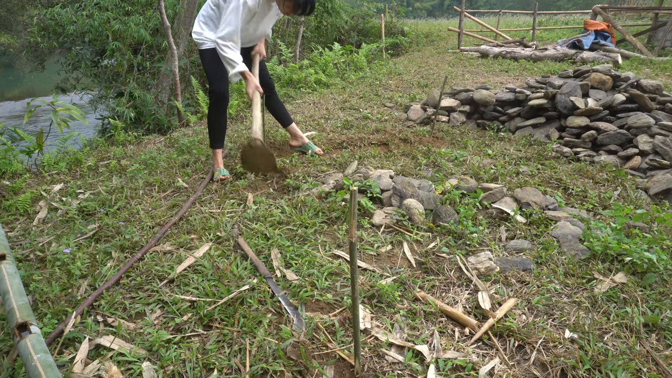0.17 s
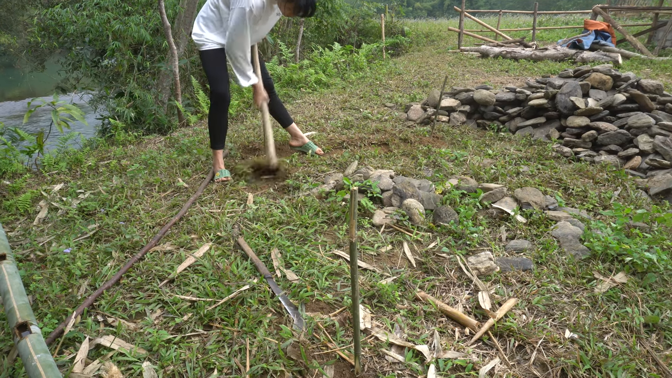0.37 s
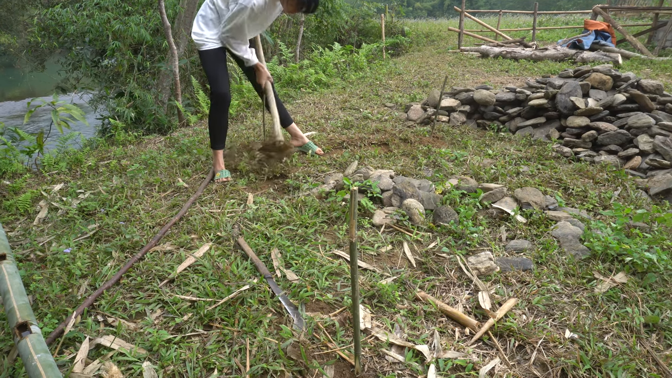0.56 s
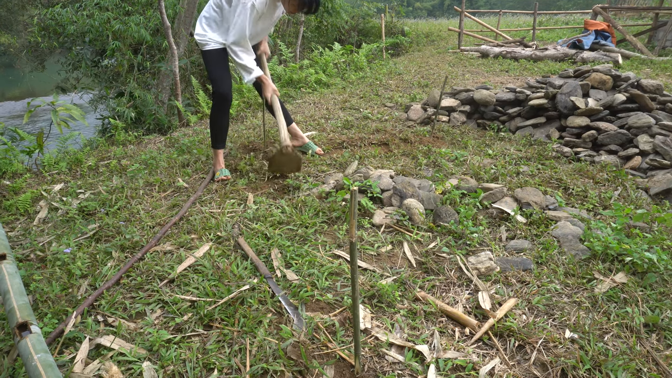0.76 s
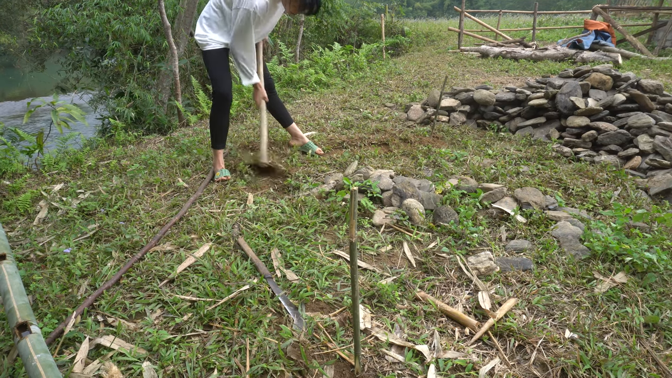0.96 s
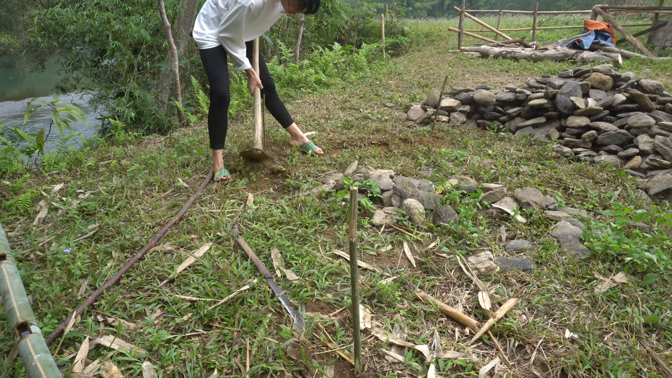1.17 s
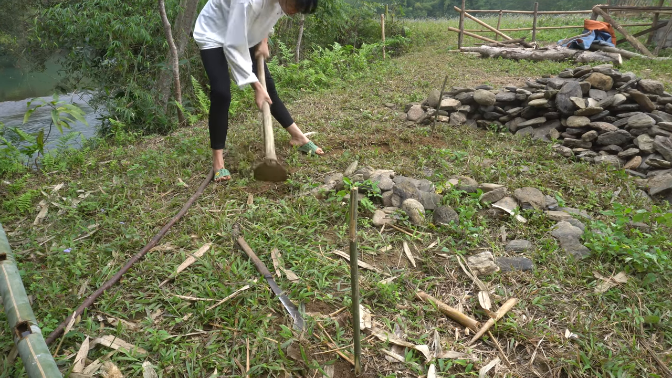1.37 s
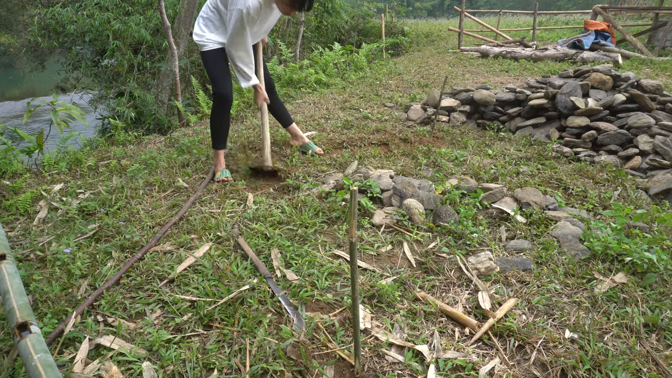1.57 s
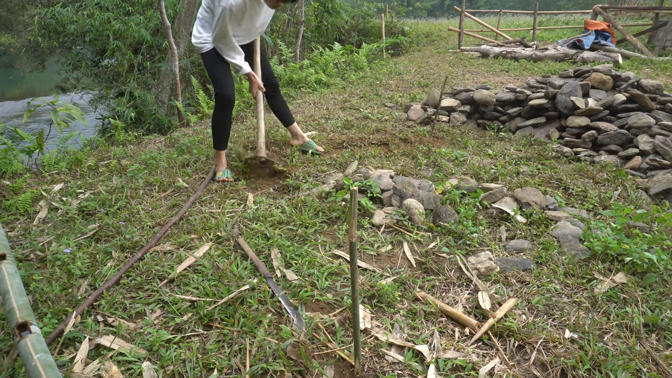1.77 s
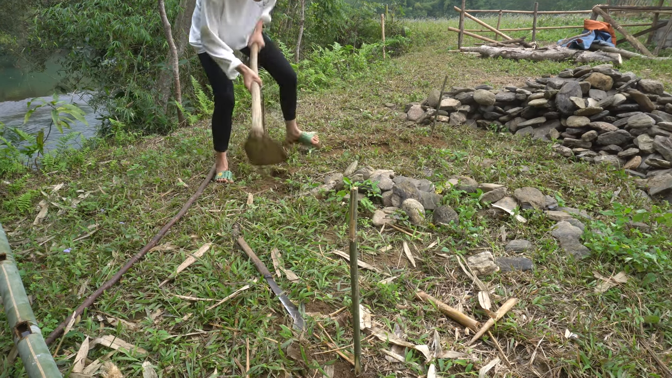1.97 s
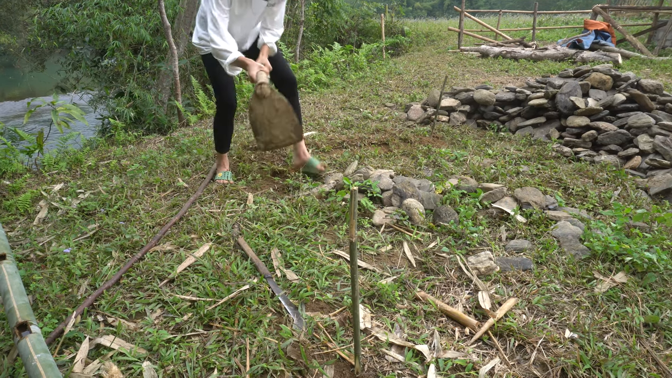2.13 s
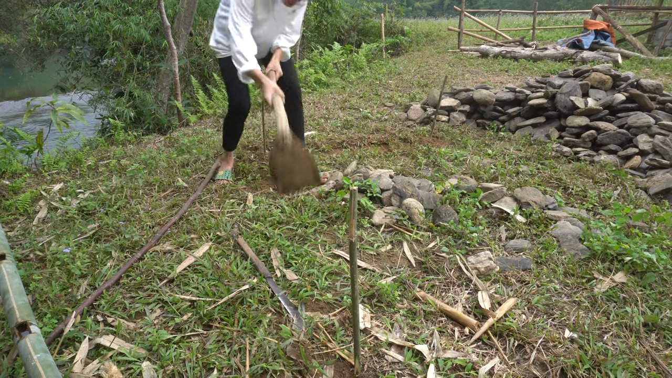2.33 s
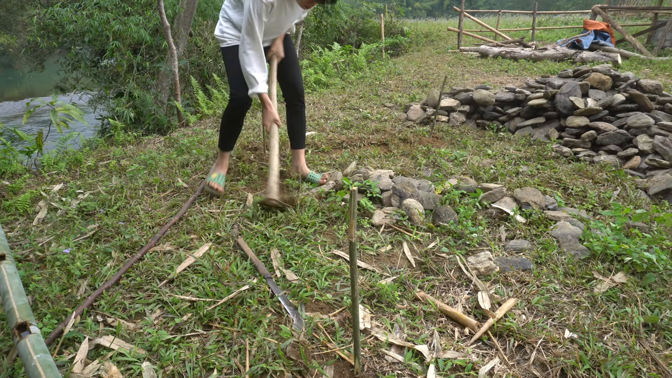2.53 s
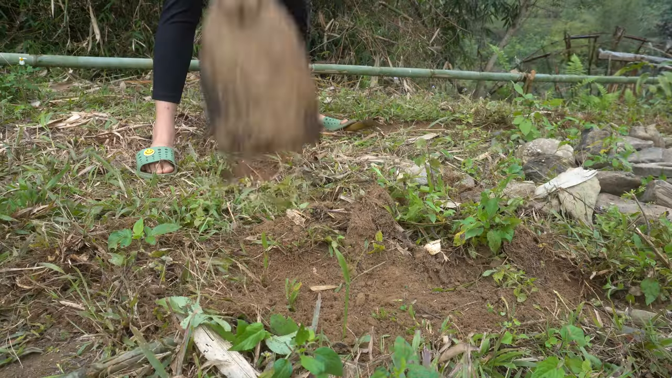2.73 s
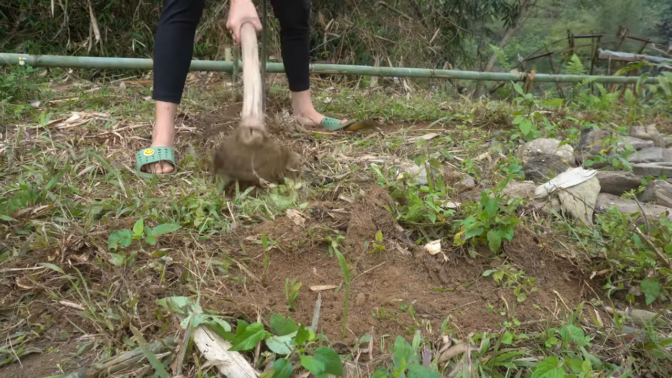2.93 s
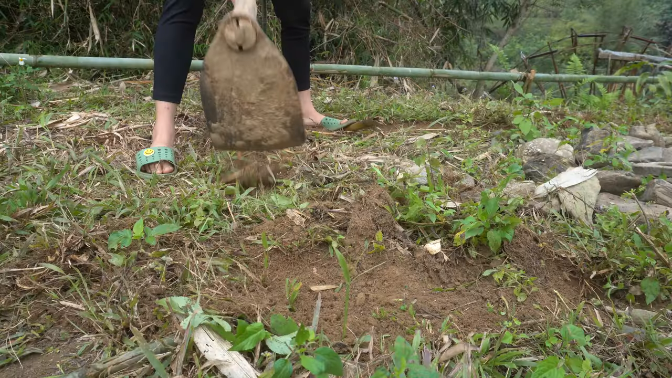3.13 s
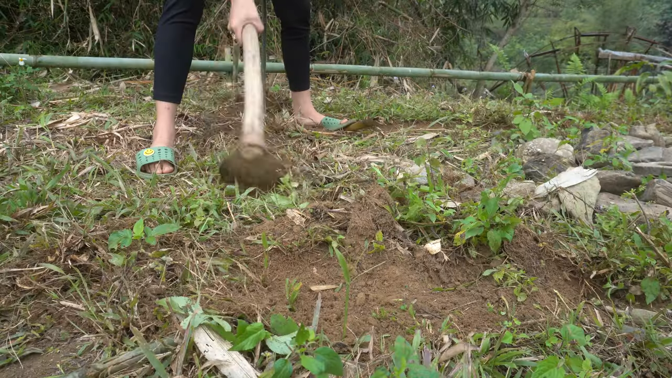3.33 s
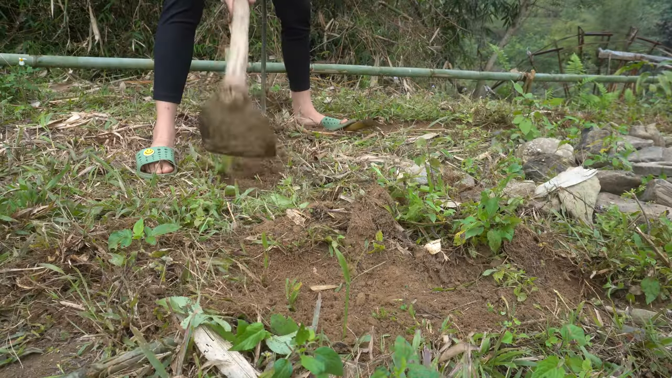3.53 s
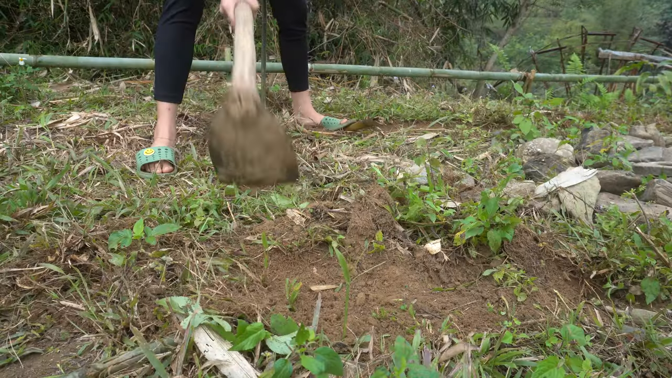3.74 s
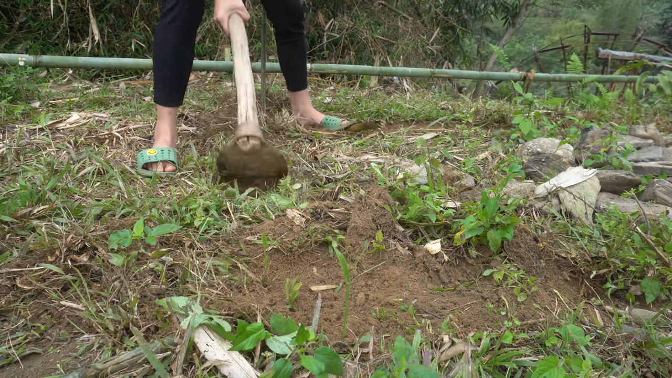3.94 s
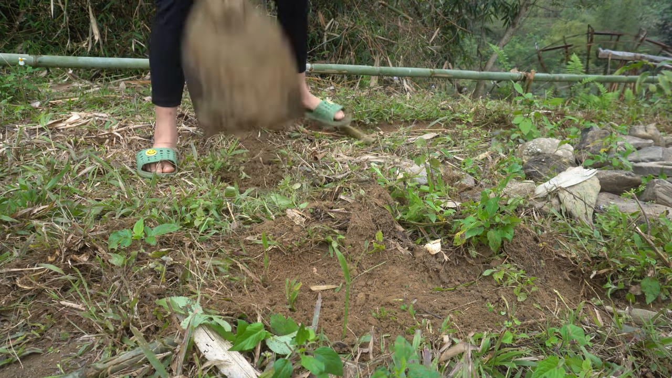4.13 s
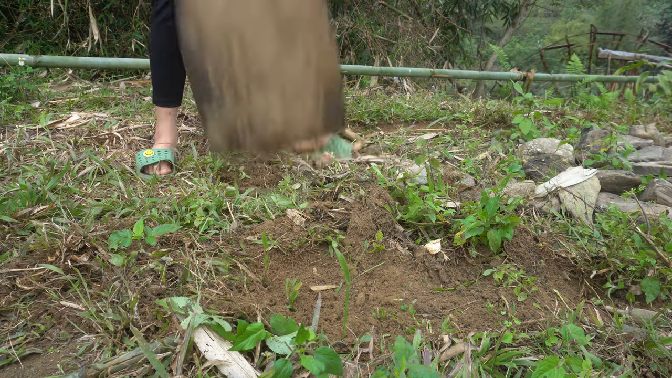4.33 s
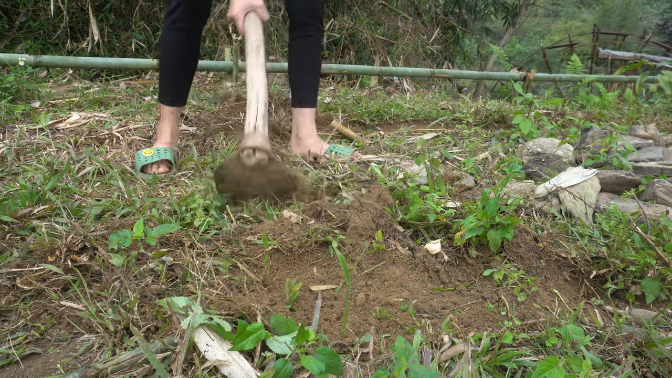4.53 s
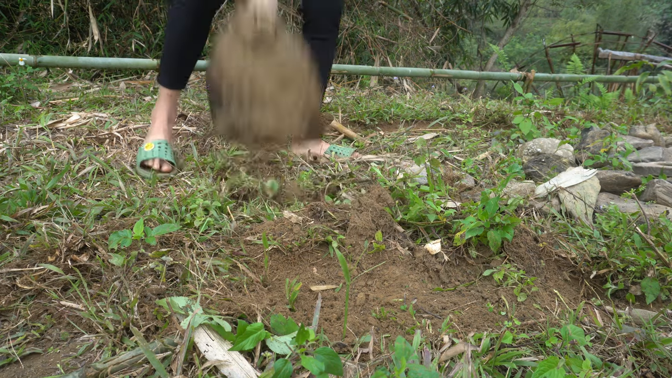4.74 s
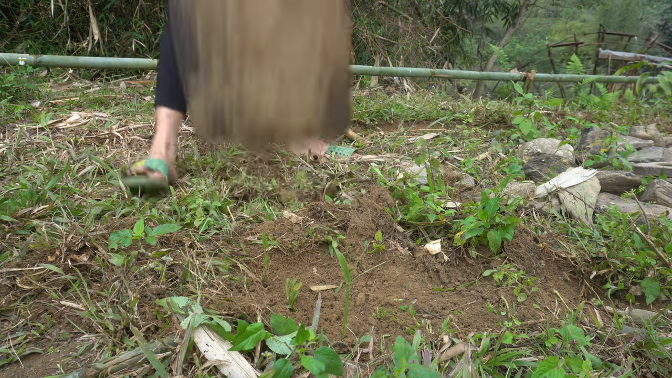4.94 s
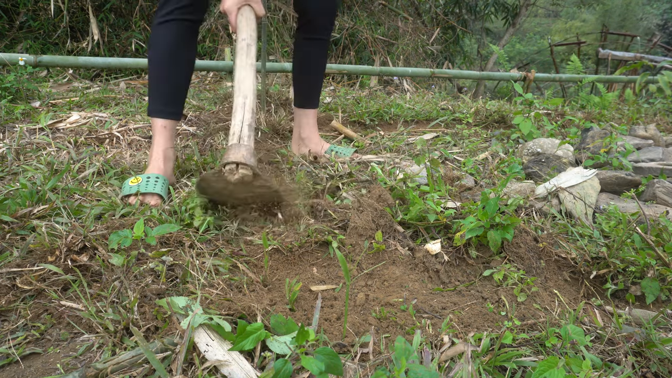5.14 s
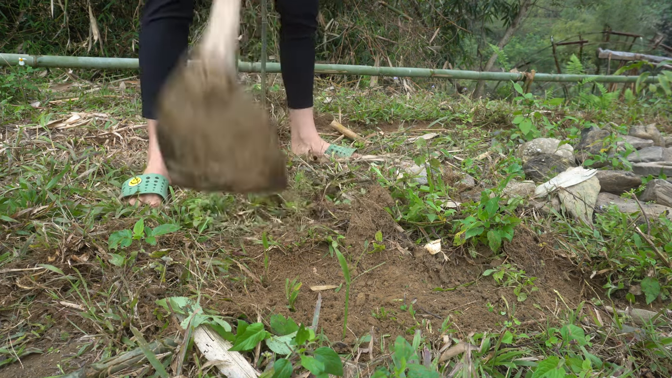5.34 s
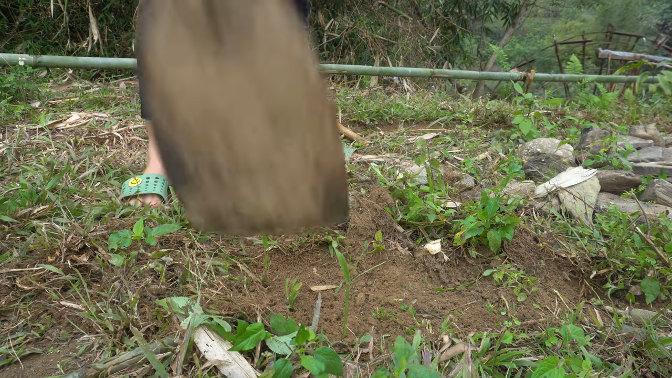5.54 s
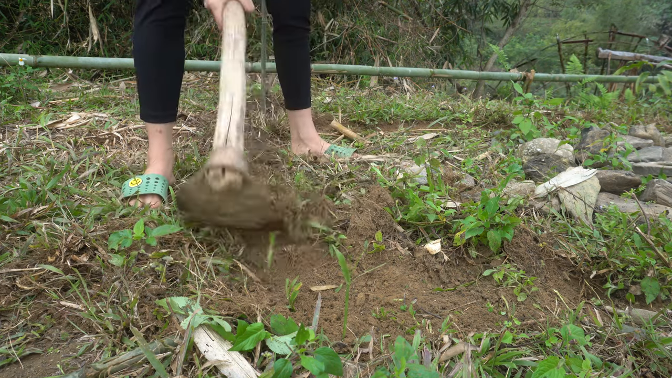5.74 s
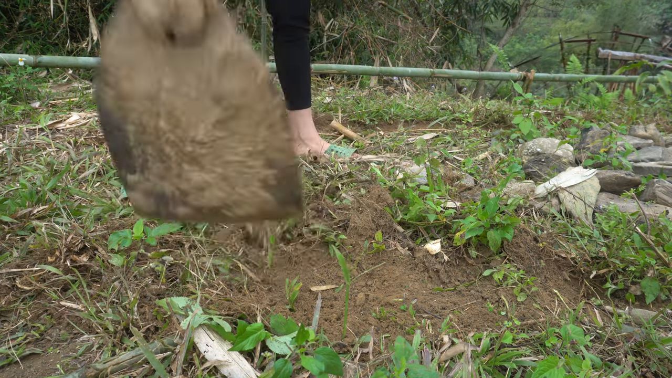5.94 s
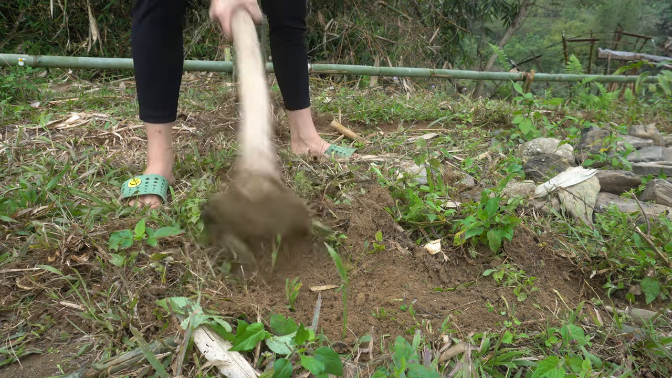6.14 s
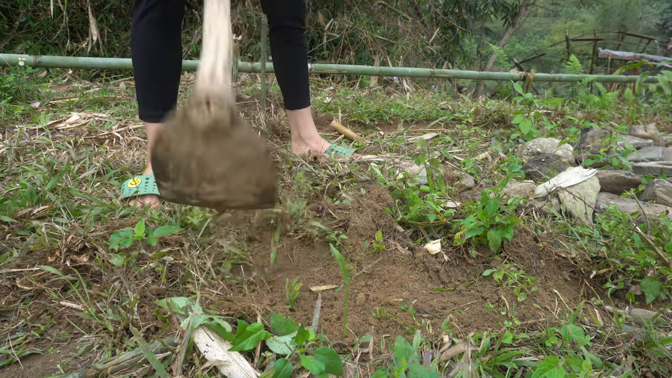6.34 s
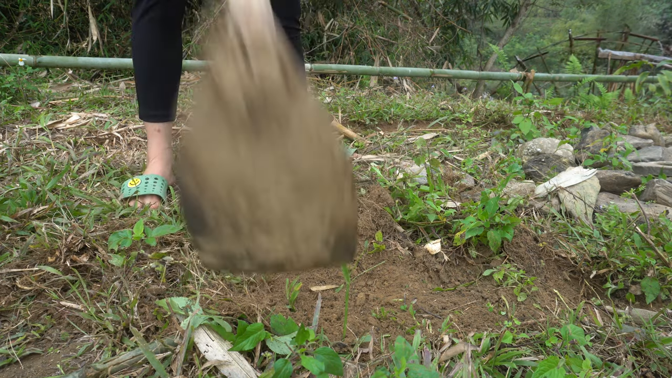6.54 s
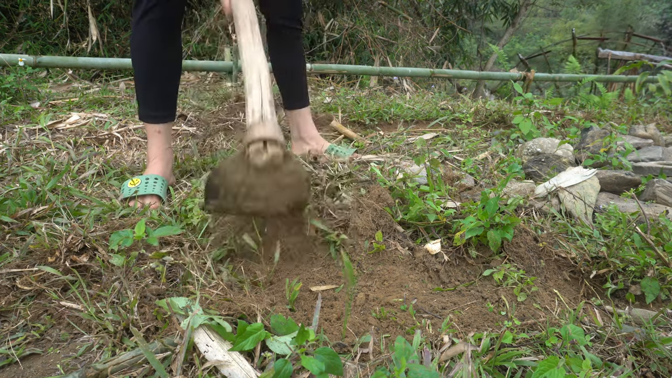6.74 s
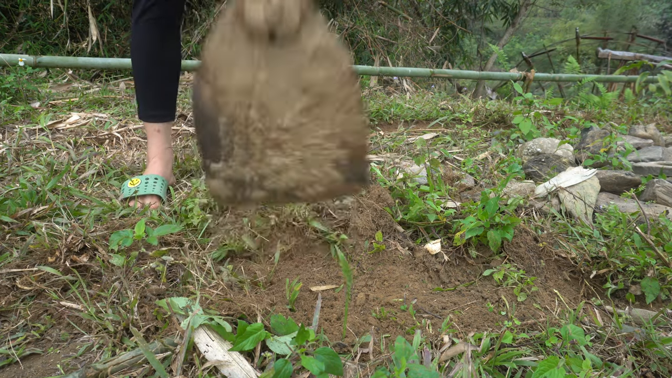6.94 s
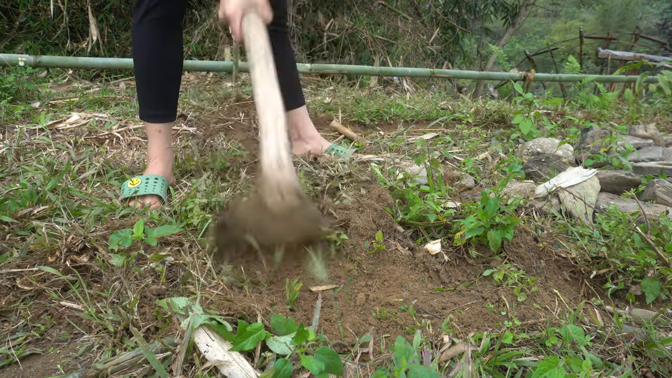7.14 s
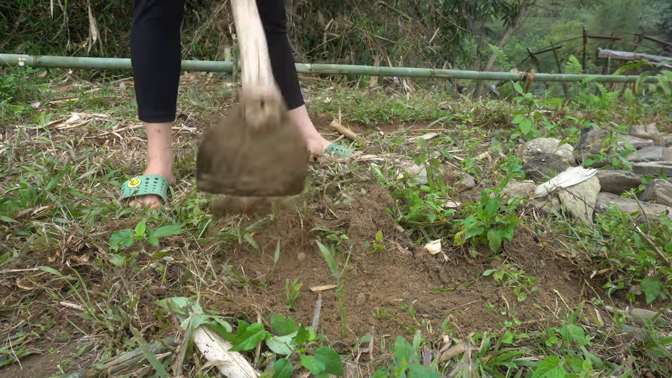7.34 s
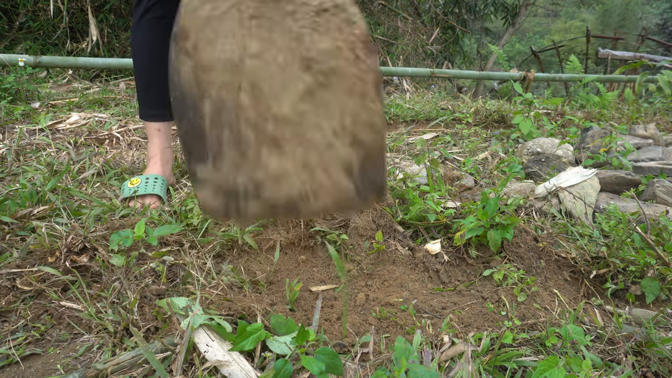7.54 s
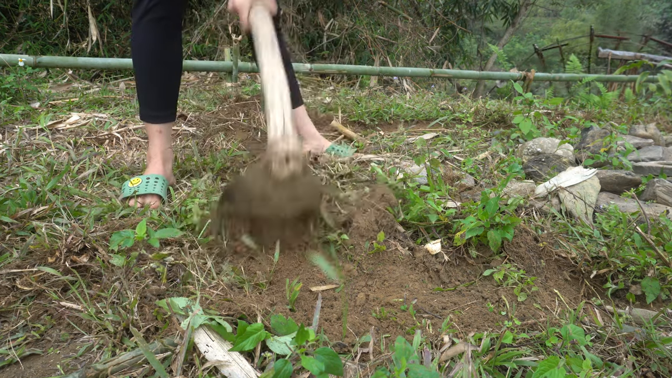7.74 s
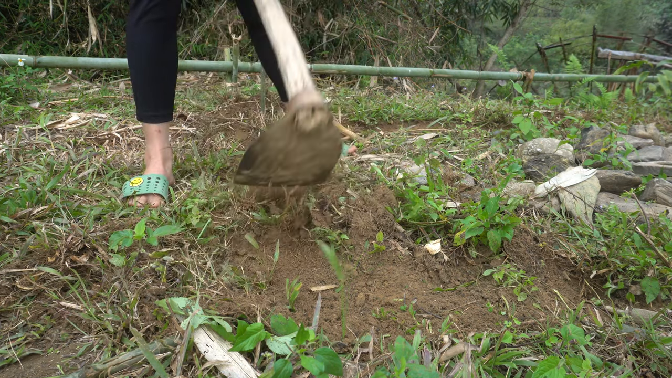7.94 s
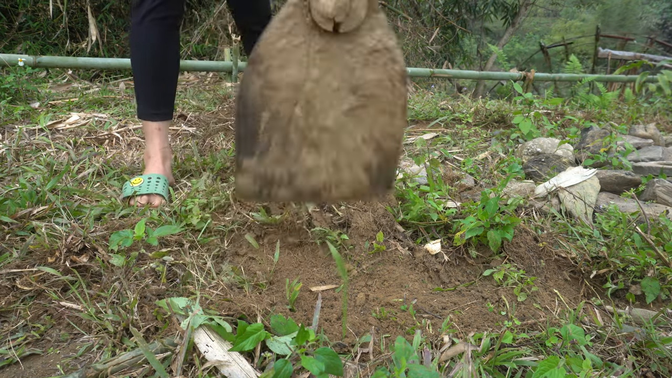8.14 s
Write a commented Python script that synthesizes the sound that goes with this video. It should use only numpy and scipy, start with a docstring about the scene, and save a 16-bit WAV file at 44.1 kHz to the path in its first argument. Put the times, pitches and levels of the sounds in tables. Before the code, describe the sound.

Outdoors, a hoe chops into grassy ground. The first strokes are soft and a few metres away, with one hollow wooden knock from the right. After a tiny silent gap the microphone is close: gritty crunches, firm low thuds, stony ticks and a brief dull steel ring come about twice a second and grow heavier. Loose soil and grass rustle between blows, while a single-cylinder engine chugs far off.

```python
"""Hoe chopping grassy soil

A hoe chops outdoors: first from a few metres, then, after a short silent cut, from close by. Each stroke crunches
grit and breaks clods (shaped grains), thuds (short swinging pushes), snaps (ticks) and rings the steel (modes).
Loose soil and dragged grass rustle as fine grains. One hollow wooden knock, made of modes, comes from the right.
Far off a slow single-cylinder engine chugs as rung exhaust and gas puffs, over hum, outdoor hiss and rumble."""
import sys
import numpy as np
from scipy import signal
from scipy.fft import rfft, irfft, next_fast_len
from scipy.io import wavfile
from scipy.ndimage import uniform_filter1d

SR = 44100
rng = np.random.default_rng(int(sys.argv[2]) if len(sys.argv) > 2 else 0)


def persist_wave(psi):
    """Save psi, clipped to +-1, as 16-bit WAV."""
    counts = np.round(np.clip(psi, -1, 1) * 32767).astype(np.int16)
    wavfile.write(sys.argv[1], SR, np.atleast_2d(counts).T)


def nominal_scale(level):
    """Amplitude ratio for a level in decibels (scalar or array-like)."""
    x = np.asarray(level, float) / 20
    return 10 ** x


N = 361619
T = np.arange(N) / SR  # seconds
FFT = next_fast_len(N)
HZ = np.arange(FFT // 2 + 1) * SR / FFT + 1e-3  # just above zero, so that its log exists

# The blade cutting in. Each row: touch in seconds, length of the cut in seconds, crunch in dB at the touch
# and at the stop, clods against the crunch in dB, crumble in dB, length of the crumble in seconds.
STROKES = [(0.322, 0.034, -39, -30, 2.5, -41.5, 0.1), (0.908, 0.024, -32, -29, -1.5, -35.5, 0.1),
           (1.493, 0.033, -41, -29, -2.5, -38, 0.067), (2.492, .03, -42, -25.5, -1.5, -30.5, 0.035),
           (2.845, 0.038, -39, -22.5, -0.5, -33, 0.043), (3.343, 0.027, -30.5, -30.5, 4.5, -48.5, 0.042),
           (3.835, 0.028, -38.5, -25.5, -2.5, -34.5, 0.052), (4.461, 0.035, -29, -16, -2.5, -28, 0.072),
           (5.07, 0.025, -22.5, -20.5, 0, -36.5, 0.07), (5.654, 0.022, -19, -21.5, -3.5, -30.5, 0.082),
           (6.112, 0.028, -39.5, -20, -4.5, -29, 0.041), (6.628, 0.027, -38.5, -20.5, -1, -39.5, 0.086),
           (7.132, 0.029, -41, -17.5, -1, -31.5, 0.094), (7.694, .102, -40, -38.5, -8, -47, .03)]
# What each stroke sets off. Each row: steel ring against the crunch in dB, favoured blade pitch in Hz,
# trickling soil in dB, treble of the grit in dB.
STROKE_AFTERMATH = [(-50, 1600, -44, 5), (-47, 1600, -50, -1), (-27.5, 1500, -48.5, 0.5),
                    (-28, 1300, -44.5, 3), (-34, 5300, -46.5, 1), (-32.5, 4680, -47.5, 1),
                    (-36.5, 5800, -53.5, -1), (-36, 2700, -45.5, 0.5), (-38, 5800, -44.5, 0.5),
                    (-22.5, 850, -49, -1.5), (-37, 2100, -50.5, -1), (-37, 4300, -55, 4),
                    (-36, 2200, -52, -3), (-59, 5800, -48, 5)]
# How alike distant sound is at the two microphones. Each row: frequency in Hz, likeness from 0 to 1.
FAR_LIKENESS = [(60, .999), (200, 0.94), (500, 0.85), (1000, 0.44), (2500, 0.23), (12000, 0.1)]
# Start and end of the silent cut between the two views, in seconds.
CUT_S = 2.748, 2.782


def along_hz(points):
    """Reads a short spectrum at every frequency, straight along log frequency."""
    hz, value = np.transpose(points)
    return np.interp(np.log(HZ), np.log(hz), value)


def gain_curve(s, db):
    """Gain over time from dB points, silent outside the curve."""
    return nominal_scale(np.interp(T, s, db)) * (T >= s[0]) * (T <= s[-1])


def colour(x, points, lo_hz, hi_hz):
    """Filters to a spectrum (Hz, dB) and scales to rms 1 between lo_hz and hi_hz."""
    spectrum = rfft(x, FFT) * nominal_scale(along_hz(points))
    inside = (HZ > lo_hz) & (HZ < hi_hz)
    band_energy = np.sum(abs(spectrum[inside]) ** 2)
    return irfft(spectrum, FFT)[:N] * np.sqrt(FFT * N / 2 / band_energy)


def grains(rate, spread_db):
    """Random clicks of either sign, rate a second on average, a few far larger than the rest."""
    boost_db = np.minimum(spread_db * rng.exponential(size=N), 5 * spread_db)
    size = rng.standard_normal(N) * nominal_scale(boost_db)
    return size * (rng.random(N) < rate / SR)


def ring(x, modes):
    """Decaying two-pole resonances (Hz, dB, seconds to fall 60 dB) driven by x."""
    out = 0
    for hz, db, t60 in modes:
        pole = np.exp((2j * np.pi * hz - np.log(1000) / t60) / SR)
        out = out + signal.lfilter([0, nominal_scale(db) * pole.imag], [1, -2 * pole.real, abs(pole) ** 2], x)
    return out


def walk(rate):
    """Smooth random wander, spread near 1, with rate new values a second."""
    k = int(SR / rate)
    steps = np.repeat(rng.standard_normal(N // k + 1), k)
    return 1.3 * uniform_filter1d(uniform_filter1d(steps, k), k)[:N]


def add(out, s, sound):
    """Mixes a short sound in at s seconds."""
    i = int(s * SR)
    out[i:i + len(sound)] += sound[:N - i]


def split(x):
    """The parts below and above a gentle treble edge at 6 kHz."""
    low = signal.lfilter(*signal.butter(1, 6000, fs=SR), x)
    return low, x - low


def ports(source, balance, likeness):
    """Two microphones share one run of a source; a second run, opposite in sign, makes them differ."""
    # Phase between the microphones. Each row: frequency in Hz, lead of the left side in radians.
    lead = [(60, -.05), (200, -.13), (1000, -.3), (2200, .05), (5000, .5), (12000, .3)]
    angle = np.arccos(np.clip(along_hz(likeness), 0, 1)) / 2
    side = np.array([[1], [-1]])  # left, right
    balance_db = along_hz(balance)  # left minus right
    tilt = nominal_scale(side * balance_db / 2) * np.exp(.5j * side * along_hz(lead))
    shared = np.cos(angle) * rfft(source(), FFT)
    unlike = 1j * side * np.sin(angle) * rfft(source(), FFT)
    mean_gain = np.cosh(balance_db * np.log(10) / 40)  # mean of the two sides' gains
    return irfft(tilt * (shared + unlike) / mean_gain, FFT)[:, :N]


def strokes():
    """Grit crackles under the blade, clods break, and the same grit shakes the steel."""
    # Grit spectrum. Each row: frequency in Hz, density in dB per Hz.
    grit_spectrum = [(530, -53), (900, 1.5), (1220, -10), (2070, -0.5), (3300, -4.5), (4700, -6),
                     (13400, -6.5), (16000, -17)]
    # Clod spectrum. Each row: frequency in Hz, density in dB per Hz.
    clod_spectrum = [(71, -10), (120, -3), (695, -2.5), (814, -12), (1010, -11), (1310, -14.5), (1590, -5),
                     (1800, -14), (2340, -64), (3960, -120)]
    ring_db, favoured_hz, _, treble_db = np.transpose(STROKE_AFTERMATH)
    starts = np.transpose(STROKES)[0] - 0.0099  # the crunch begins just before the touch
    stroke = (np.searchsorted(starts, T) - 1).clip(0)
    crunch, body = stroke_shape()
    grit = grains(14000, 1.3) * nominal_scale(3.23 * walk(300))  # the blade slips in jerks
    clods = colour(grains(2500, 0.96), clod_spectrum, 250, 1000)
    shake = crunch * nominal_scale(ring_db)[stroke] * grit / grit.std()
    dull, bright = split(colour(grit, grit_spectrum, 2200, 12100))
    crackle = crunch * (dull + nominal_scale(treble_db)[stroke] * bright)
    return crackle + body * clods + blade(shake, favoured_hz[stroke])


def stroke_shape():
    """Crunch and clod gains: touch, cut through grass, bite into soil, stop, crumble."""
    lead_s, drop_s = 0.0099, 0.013  # start before the touch; fall to a crumble once the blade stops
    bite_at, bite_share = 0.8, 0.32  # share of the cut gone, and of the dB rise reached, at the bite
    faint_db, silent_db = -54, -69  # where the crumble ends; between strokes
    s, cut, touch_db, stop_db, clods_db, crumble_db, crumble = np.transpose(STROKES)
    stop, flat = s + cut, np.ones(len(s))
    end = stop + drop_s + crumble
    times = [s - lead_s, s, s + bite_at * cut, stop, stop + drop_s, end, end + lead_s]
    bite_db = touch_db + bite_share * (stop_db - touch_db)
    db = np.array([silent_db * flat, touch_db, bite_db, stop_db, crumble_db, faint_db * flat, silent_db * flat])
    # clods break mostly when the blade is deepest
    depth_db = np.array([-9, -9, -4.5, 0, 0, -22, -22])[:, None]
    times = np.ravel(times, "F")  # stroke after stroke
    crunch = gain_curve(times, np.ravel(db, "F"))
    return crunch, gain_curve(times, np.ravel(db + clods_db + depth_db, "F"))


def thuds():
    """The blade stops in the ground: a soft push swells, swings back and dies."""
    # Each row: time of the full swell in seconds, its level in dB, pitch in Hz, rise in seconds.
    stops = [(0.363, -27.5, 150, 0.002), (0.933, -36.5, 242, 0.0018), (2.88, -28, 168, .0017),
             (3.363, -17, 166, 0.00096), (3.864, -28, 229, 0.0036), (4.488, -39, 81, 0.0076),
             (4.491, -19.5, 186, 0.0041), (5.082, -19, 219, .0022), (5.661, -17.5, 152, 0.0062),
             (6.139, -14, 174, 0.00076), (6.155, -23, 110, 0.0032), (6.658, -15.5, 109, 0.0041),
             (7.163, -10, 136, 0.0015), (7.727, -25.5, 140, 0.0044)]
    out, t = np.zeros(N), T[:SR // 8]
    for s, db, hz, swell in stops:
        swing = -np.cos(2 * np.pi * hz * (t - swell))
        envelope = t / swell * np.exp(1 - t / swell)
        add(out, s - swell, nominal_scale(db) * swing * envelope)
    return out


def snaps():
    """Stones and snapping stems: a sharp tick with a short gritty tail also strikes the steel."""
    # Each row: start in seconds, relative level in dB, pitch in Hz, push on the blade against that level in dB.
    ticks = [(0.36, -7, 1650, -30), (0.97, -15, 1560, -14), (1.497, -21.5, 1600, -26),
             (1.521, -20, 680, -4), (2.518, -13, 2570, -29), (2.869, -33, 1610, -19),
             (3.303, -31, 3010, -11), (3.889, -17.5, 1320, -18), (4.464, -27, 2400, -24),
             (4.49, -10.5, 680, -7.5), (4.547, -30, 684, -1), (4.975, -29, 5000, -25),
             (5.289, -21, 9200, -25), (5.629, -32, 2150, 0.5), (5.675, -16, 680, -7),
             (5.691, -25, 1600, -2), (5.71, -22.5, 5820, -12), (6.113, -27.5, 3010, -11),
             (6.118, -19, 3010, -16), (6.14, -5.5, 2060, -19), (6.601, -19.5, 9300, -30),
             (6.632, -25, 3010, -9), (6.65, -10, 676, -11), (6.668, -30.5, 2100, 4.5),
             (7.107, -26, 7500, -28), (7.158, -19, 704, -1), (7.174, -28.5, 5900, -2),
             (7.36, -32, 7000, -22), (7.447, -38, 10000, -30), (7.665, -22, 3010, -31),
             (7.709, 1, 8700, -22), (7.7151, -2.5, 4900, -35), (7.793, -21, 3000, -24),
             (8.129, -36, 12000, -30)]
    tick_s, grit_s, grit_db = 0.00046, 0.0026, -9.5  # decay of the tick and of its grit; grit level
    out, push, favoured_hz, t = np.zeros(N), np.zeros(N), np.ones(N), T[:SR // 50]
    for s, db, hz, ring_db in ticks:
        noise = rng.standard_normal(len(t))
        noise = signal.lfilter([1, -np.exp(-2500 / hz)], [1], noise)  # brighter ticks have thinner grit
        tick = np.sin(2 * np.pi * hz * t) * np.exp(-t / tick_s)
        tail = nominal_scale(grit_db) * noise * np.exp(-t / grit_s)
        add(out, s, nominal_scale(db) * (tick + tail) / np.sqrt(2))
        i = int(s * SR)
        push[i], favoured_hz[i] = nominal_scale(db + ring_db), hz
    return out + blade(push, favoured_hz)


def blade(push, favoured_hz):
    """The steel rings briefly; the spot that is struck favours the modes near one pitch."""
    # Modes of the blade. Each row: pitch in Hz, level in dB, time to fall 60 dB in seconds.
    modes = [(679.6, 0.5, 0.076), (1350, -15, 0.11), (1610, -9.5, 0.08), (2060, -6, 0.1), (2730, -2, 0.048),
             (3028, -1, 0.11), (3550, -6, 0.076), (4365, 1, 0.07), (5820, 4.5, 0.062), (6200, 4, 0.047),
             (7500, 1, 0.026)]
    off_mode_db = -8  # per octave away from the favoured pitch
    out, struck = 0, np.flatnonzero(abs(push) > 1e-6)
    for mode in modes:
        octaves = abs(np.log2(mode[0] / favoured_hz[struck]))
        weighted = np.zeros(N)
        weighted[struck] = push[struck] * nominal_scale(off_mode_db * octaves)
        out = out + ring(weighted, [mode])
    return out


def rustle():
    """Fine dry grains: soil trickles after each stroke, grass is dragged and feet shift."""
    # Spectrum of the grains. Each row: frequency in Hz, density in dB per Hz.
    dust_spectrum = [(410, -4), (750, -7.5), (1640, -1), (3740, -5), (10000, -1.5), (16000, -5)]
    # Grass dragged, feet shifting. Each row: loudest moment in seconds, level in dB, rise in seconds,
    # fall in seconds, treble against the rest in dB.
    drags = [(.02, -43, 0.11, 0.27, -9), (.17, -48.5, 0.086, .12, -10), (.44, -50.5, 0.075, 0.069, 7),
             (2.2, -44, 0.079, 0.094, 0), (3.3, -51.5, 0.36, 0.58, 1), (4.02, -58.5, 0.028, 0.084, 11),
             (4.16, -53.5, .08, 0.14, 7), (4.36, -38, 0.085, 0.058, 1.5), (4.88, -43.5, 0.093, 0.33, -3.5),
             (5.27, -43.5, 0.14, 0.087, 0.5), (6.198, -60, 0.25, .3, -2), (7.98, -41.5, 0.12, 0.17, -2.5),
             (8.06, -40.5, 0.16, 0.029, -5)]
    trickle_rise_s, trickle_fall_db_s = 0.031, 35.5  # builds after the stop, thins out in dB a second
    edge_db, stir_db = -16.5, -59  # a drag at the ends of its rise and fall; the grass never quite rests
    stops = np.array([s + cut for s, cut, *_ in STROKES])
    last = (np.searchsorted(stops, T) - 1).clip(0)
    since = T - stops[last]
    trickle_db = np.transpose(STROKE_AFTERMATH)[2][last] - trickle_fall_db_s * since
    trickle = (since / trickle_rise_s).clip(0, 1) * nominal_scale(trickle_db) ** 2
    power = np.ones((2, 1)) * (nominal_scale(stir_db) ** 2 + trickle)  # rows: below and above the treble edge
    for s, db, rise, fall, treble_db in drags:
        span = slice(max(int((s - 2 * rise) * SR), 0), int((s + 2 * fall) * SR))
        away = np.maximum((s - T[span]) / rise, (T[span] - s) / fall)
        power[:, span] += nominal_scale(db + edge_db * away + np.array([[0], [treble_db]])) ** 2
    dust = colour(grains(14000, 2.1) * nominal_scale(1.17 * walk(40)), dust_spectrum, 4000, 12200)
    return np.sum(np.sqrt(power) * split(dust), axis=0)


def knock():
    """A blunt blow on hollow wood and one rebound; the deepest part does not carry through the air."""
    # The blow and its rebound. Each row: start in seconds, relative strength in dB.
    blows = [(0.2298, -4), (0.2386, -22)]
    # Modes of the wood. Each row: pitch in Hz, relative level in dB, time to fall 60 dB in seconds.
    modes = [(132, -29, 0.099), (272, -9.5, 0.52), (390, 0.5, 0.33), (462, 5, 0.11), (535, 8.5, 0.056),
             (684, -2, 0.12), (840, 13, 0.016), (920, 3, 0.094), (1290, 2, 0.049)]
    push, t = np.zeros(N), T[:SR // 100]
    for s, db in blows:
        add(push, s, nominal_scale(db) * t / 0.00036 * np.exp(-t / 0.00021))
    dying = np.exp(-(T - .24).clip(0) / 0.048) * (T > .24)
    rattle = grains(400, 1.3) * dying * nominal_scale(-11.0)  # loose parts keep shaking it
    push += uniform_filter1d(rattle, size=24)
    high_pass = signal.butter(2, 140, "high", fs=SR, output="sos")
    return signal.sosfilt(high_pass, ring(push, modes) * nominal_scale(-28))


def engine(view):
    """Each firing of the far engine rings the exhaust and lets out a puff of gas."""
    # One list for each view. Each row: time in seconds, firings a second, exhaust in dB, gas hiss in dB.
    firings = [
        [(0, 23, -52, -50), (.3, 19.5, -57, -50.5), (.4, 21.2, -52, -57), (.5, 22.1, -51.5, -56.5),
         (.9, 22.3, -51.5, -50.5), (1.45, 22.6, -54, -57.5), (1.6, 22.6, -55.5, -55), (2.74, 22.6, -62, -70)],
        [(2.78, 17, -62, -58), (3.15, 17.2, -51, -50.5), (3.7, 17.5, -60, -59), (8.2, 17.3, -62, -62.5)],
    ]
    # Exhaust resonances, one list for each view. Each row: pitch in Hz, width in Hz, relative level in dB.
    exhaust = [
        [(90.5, 14, -3), (173, 10.2, -11), (270, 33, 7.5), (393.4, 24, 4.5)],
        [(105, 21, -7), (190, 14, -4), (263, 88, 3), (380, 19, 4.5)],
    ]
    # Gas hiss colour, one list for each view. Each row: frequency in Hz, density in dB per Hz.
    gas_spectrum = [
        [(400, -7), (1500, -4.5), (2900, -0.5), (3900, -4), (4500, -8.5), (5300, -4), (6100, -4.5), (6600, -14),
         (9000, -9), (12000, -12.5), (15500, -18)],
        [(400, -36), (1800, -5.5), (2550, -1.5), (3260, -2.5), (4200, -5.5), (5300, -3), (6500, -9),
         (15000, -17)],
    ]
    # Relative level of the hiss between puffs in each view, in dB.
    steady_gas_db = [-15, 3]
    first_firing_s = .022
    tick_s, second_tick_s = .0025, .0072  # each puff opens with two ticks: their decay, delay of the second
    puff_s, puff_db = .016, -6  # decay and level of the puff against the ticks
    s, rate, pipe_db, gas_db = np.transpose(firings[view])
    rate = np.interp(T, s, rate)
    turns = np.cumsum(rate) / SR - first_firing_s * rate[0]
    fired = np.diff(np.floor(turns), prepend=-1).clip(0, 1) * nominal_scale(1.1 * walk(25))
    modes = [(hz, db, np.log(1000) / np.pi / width) for hz, width, db in exhaust[view]]
    pipe = colour(ring(fired, modes), [(20, 0), (2000, 0)], 200, 450)  # flat: sets the level only
    since = turns % 1 / rate  # seconds since the last firing
    second_tick = (since > second_tick_s) * np.exp(-abs(since - second_tick_s) / tick_s)
    ticks = np.exp(-since / tick_s) + second_tick
    shape = ticks + nominal_scale(puff_db) * np.exp(-since / puff_s) + nominal_scale(steady_gas_db[view])
    puffs = shape * nominal_scale(1.04 * walk(9.9)) * rng.standard_normal(N)
    gas = colour(puffs, gas_spectrum[view], 3500, 6500)
    return pipe * gain_curve(s, pipe_db) + gas * gain_curve(s, gas_db)


def surroundings(view):
    """Far engine, hum and a wide hiss of noise whose level breathes a little."""
    # Outdoor hiss, one list for each view. Each row: frequency in Hz, density in dB per Hz.
    air_spectrum = [
        [(15, -31), (25, -15.5), (53, -11.5), (93, -8), (207, -12), (264, -10.5), (501, -13), (3010, -17),
         (6540, -30), (15000, -43)],
        [(20, -48), (108, 0), (300, -6.5), (390, -2.5), (660, -11), (1560, -12), (3000, -13), (8000, -23.5),
         (16000, -29)],
    ]
    # Level of the hiss in each view, in dB.
    air_db = [-45.5, -48]
    # Stereo balance, one list for each view. Each row: frequency in Hz, left minus right in dB.
    far_balance = [(200, 0.23), (500, 2.5), (1000, 4.1), (4000, 8.7), (15000, 11)], [(200, 0), (500, -0.5),
                   (2000, 2.5), (12000, -3.5)]
    breath = nominal_scale(air_db[view] + 2.3 * walk(3.405))

    def far():
        """Hiss and engine as they reach the microphones."""
        return breath * colour(rng.standard_normal(N), air_spectrum[view], 22, 16200) + engine(view)

    return ports(far, far_balance[view], FAR_LIKENESS) + hum(view)


def hum(view):
    """A deep sine whose pitch and level waver a little."""
    # One list for each view. Each row: time in seconds, pitch in Hz, rms level in dB.
    tone = [
        [(0, 42.4, -50.5), (.93, 44.25, -56), (1.7, 41.4, -48), (2.74, 39.22, -48)],
        [(2.78, 52.35, -78), (8.2, 52.5, -56)],
    ]
    s, hz, db = np.transpose(tone[view])
    pitch = np.interp(T, s, hz) + 1.61 * walk(4.1)
    level = np.sqrt(2) * gain_curve(s, db) * nominal_scale(0.51 * walk(8))
    return level * np.sin(2 * np.pi * np.cumsum(pitch) / SR)


def rumble():
    """Deep unsteady ground noise, the same on both sides."""
    # One list for each view. Each row: time in seconds, level in dB.
    swells = [
        [(0, -47), (2.74, -64)],
        [(2.79, -75), (4.2, -57), (5.4, -83), (6.2, -57), (7.2, -70), (7.5, -70), (8.2, -67)],
    ]
    level = sum(gain_curve(*np.transpose(rows)) for rows in swells)
    spectrum = [(10, -18), (22, -24), (40, 23), (70, 15.0), (120, -44)]  # Hz, dB per Hz
    return level * colour(rng.standard_normal(N), spectrum, 14, 105)


def scene():
    """Hoe, wood and rumble throughout, with the surroundings of one view on each side of the cut."""
    # The hoe in stereo, two lists. Each row of the first: frequency in Hz, left minus right in dB.
    # Each row of the second: frequency in Hz, likeness from 0 to 1.
    near_balance, near_likeness = [(100, 1), (1000, 2), (2200, -0.5), (3500, 7.5), (14000, 7.5)], [(300, 1),
                                   (2000, 0.99), (4000, 0.83), (12000, 0.55)]
    # The wooden knock in stereo. Each row: frequency in Hz, left minus right in dB.
    wood_balance = [(150, -.5), (500, -2.5), (1200, -4)]
    hoe = ports(lambda: strokes() + thuds() + snaps() + rustle(), near_balance, near_likeness)
    wood = ports(knock, wood_balance, FAR_LIKENESS)
    second = T > sum(CUT_S) / 2
    return hoe + wood + surroundings(0) * ~second + surroundings(1) * second + rumble()


def roll_off(x):
    """The treble ends steeply here."""
    return signal.sosfilt(signal.butter(12, 16980, fs=SR, output="sos"), x)


def record(dry):
    """The cut silences the sound for a moment; loud peaks are rounded and the top is trimmed."""
    out_s, in_s = CUT_S
    fade_times = [out_s - .03, out_s, in_s, in_s + .002]
    fade = np.interp(T, fade_times, [1, 0, 0, 1]) ** 1.3
    rounded = .75 * np.tanh(dry * fade / .75)
    low_pass = signal.ellip(8, .2, 70, 16000, fs=SR, output="sos")
    return roll_off(signal.sosfilt(low_pass, rounded))


dry = scene()
out = record(dry)
persist_wave(out)
```